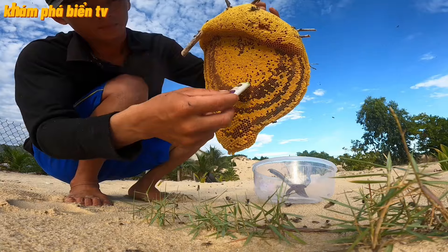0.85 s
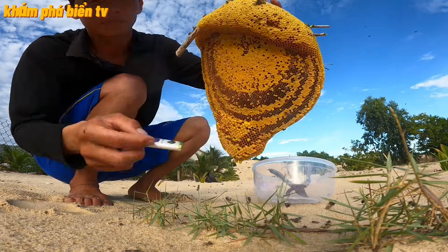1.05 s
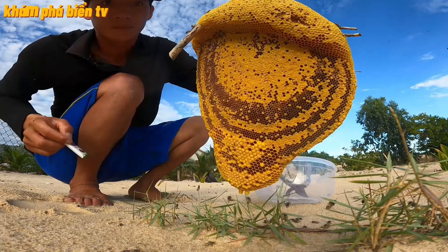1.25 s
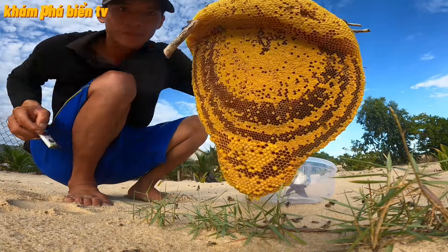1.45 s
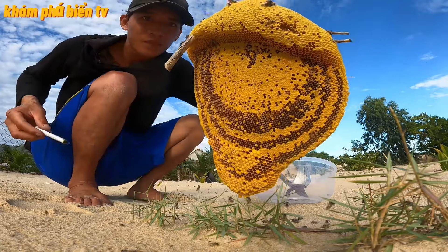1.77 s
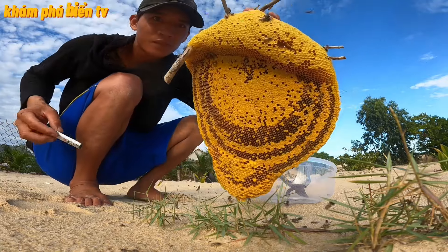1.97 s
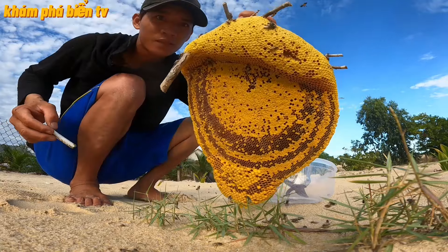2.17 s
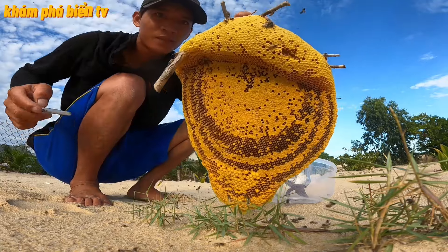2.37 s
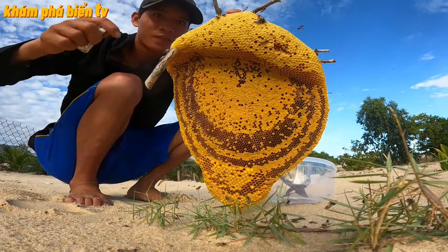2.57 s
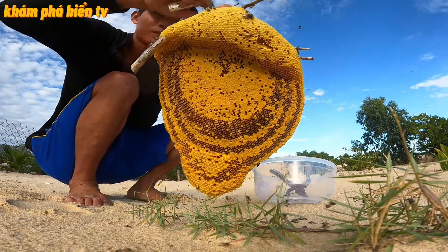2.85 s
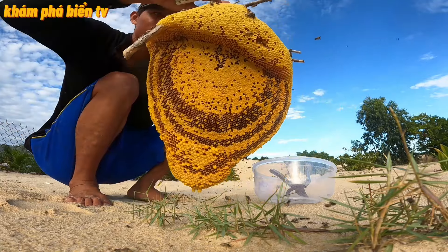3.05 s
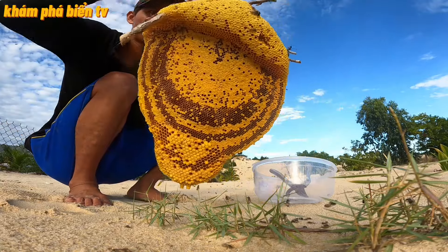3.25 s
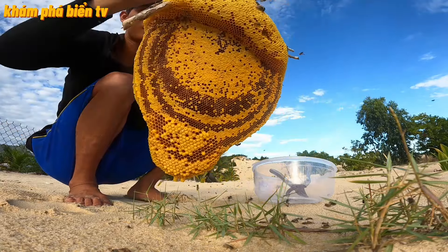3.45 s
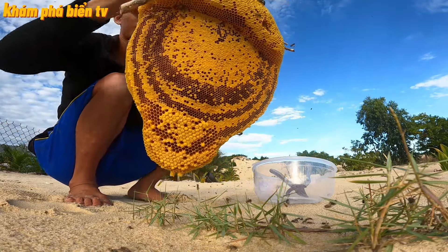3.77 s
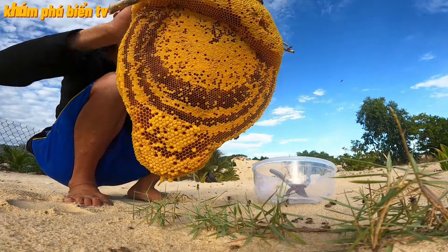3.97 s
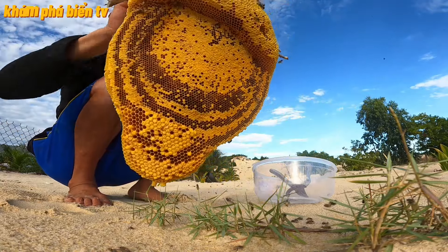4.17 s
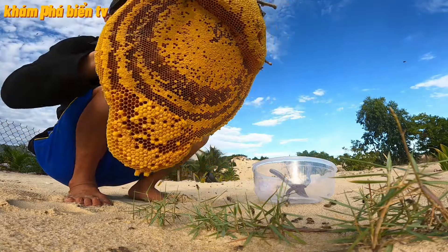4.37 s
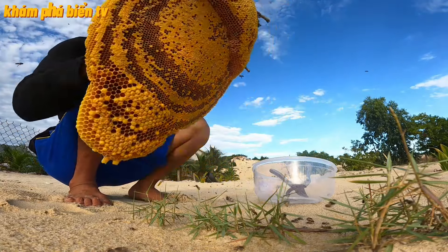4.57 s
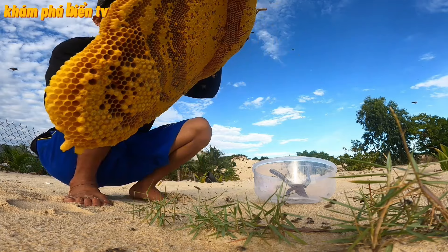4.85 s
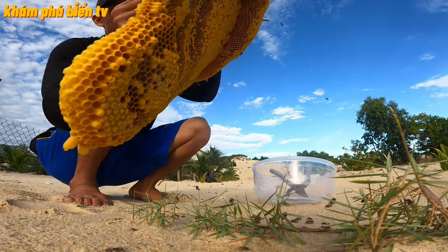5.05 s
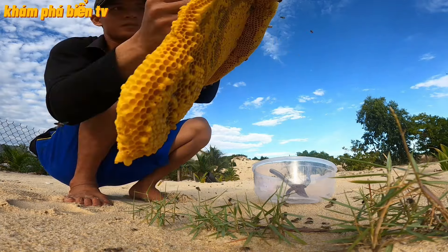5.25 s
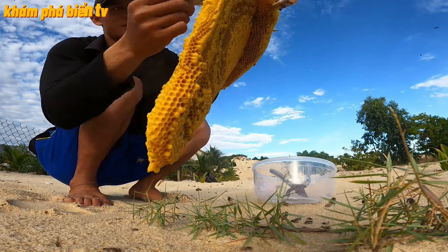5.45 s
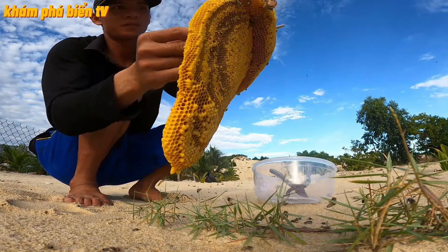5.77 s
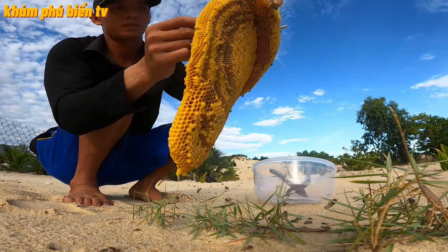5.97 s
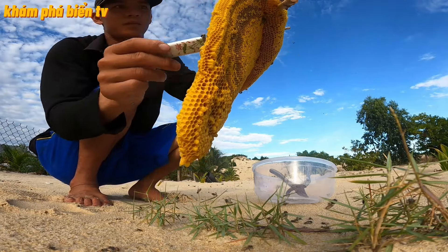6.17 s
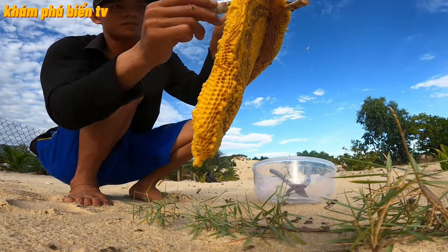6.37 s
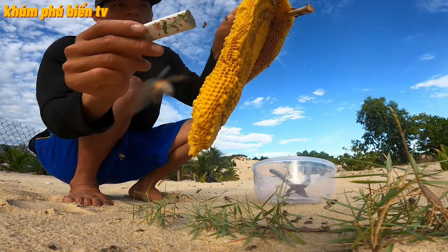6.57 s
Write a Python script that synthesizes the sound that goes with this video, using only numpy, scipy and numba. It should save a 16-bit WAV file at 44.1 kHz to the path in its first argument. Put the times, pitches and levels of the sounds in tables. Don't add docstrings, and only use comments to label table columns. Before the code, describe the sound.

Crisp scraping and cracking of comb wax, quieter ticking and faint bee hum, then sharp wrapper snaps, with gusty rumble and a low far-off motor.

```python
import sys
import numpy as np
from scipy import signal
from scipy.fft import rfft, irfft
from scipy.io import wavfile
from scipy.ndimage import uniform_filter1d
from numba import njit

SR = 44100
rng = np.random.default_rng(int(sys.argv[2]) if len(sys.argv) > 2 else 0)


def to_wav(sig):
    pcm = np.clip(np.atleast_2d(sig), -1, 1) * 32767
    pcm = np.round(pcm).astype(np.int16)
    wavfile.write(sys.argv[1], SR, pcm.T)


def ratio_of_db(decibels):
    return 10 ** (np.asarray(decibels, float) / 20)


N = 296352
T = np.arange(N) / SR
F = np.maximum(np.fft.rfftfreq(N, 1 / SR), 1)
TICK_T60_S = 0.015


def level(x, db=0):
    return x * ratio_of_db(db) / np.sqrt(np.mean(x ** 2))


def curves(table):
    s, *columns = np.transpose(table)
    return [np.interp(T, s, c) for c in columns]


def shape(points, hz):
    f, db = np.transpose(points)
    return np.interp(np.log(hz), np.log(f), db)


def walk(rate):
    k = int(SR / rate)
    held = np.repeat(rng.standard_normal(N // k + 1), k)
    return level(uniform_filter1d(uniform_filter1d(held, k), k)[:N])


def puffs(table):
    lift = 0
    for s, length, db in table:
        u = np.clip((T - s) / length, 0, 1)
        lift = lift + db * np.sqrt(np.sin(np.pi * u).clip(0))
    return lift


def swells(table, lull_db):
    size = ratio_of_db(lull_db)
    for s, length, db in table:
        u = np.clip((T - s) / length, -.5, .5)
        size = size + ratio_of_db(db) * np.cos(np.pi * u).clip(0) ** 1.33
    return size


def add(out, s, sound):
    i = int(s * SR)
    out[:, i:i + sound.shape[1]] += sound[:, :N - i]


@njit
def svf(x, hz, width):
    y, b, l = np.empty(len(x)), 0., 0.
    for i in range(len(x)):
        g, k = np.tan(np.pi * hz[i] / SR), width / hz[i]
        v = (b + g * (x[i] - l)) / (1 + g * (g + k))
        b, l, y[i] = 2 * v - b, l + 2 * g * v, k * v
    return y


def band(x, hz, width):
    y = svf(svf(x, hz + 0 * x, width), hz + 0 * x, width)
    return y / np.abs(y).max()


def grit(rate, scatter_db):
    size_db = np.minimum(scatter_db * rng.exponential(1, N), 5)
    return (rng.random(N) < rate / SR) * rng.standard_normal(N) * ratio_of_db(size_db)


def wax(shock, hz, width, body_db, dust_db, dust_hz):
    heard = []
    for c in shock:
        bright = band(svf(c, hz + 0 * c, 2 * width), hz, width)
        body = band(c, 915.0, 810.0) + 0.98 * band(c, 603.0, 570.0) + 0.42 * band(c, 455.0, 300.0)
        dust = band(c, dust_hz, 0.42 * dust_hz)
        heard.append(bright + ratio_of_db(body_db) * body + ratio_of_db(dust_db) * dust)
    return np.array(heard)


def strokes(table, width, dust_hz, rate, slip_db, pan_db):
    out, size = np.zeros((2, N)), 14000
    tear = level(grit(rate, 1.5)) + .8 * rng.standard_normal(N)
    tear = tear + .3 * rng.standard_normal((2, N))
    slip = ratio_of_db(slip_db * walk(170))
    pan = ratio_of_db(np.array([[pan_db], [-pan_db]]) / 2)
    for s, length, db, hz, body_db, dust_db in table:
        i = int(s * SR)
        u = np.clip(T[:min(size, N - i)] / length, 0, 1)
        swell = np.sin(np.pi * u).clip(0) ** .8 * (u < 1) * slip[i:i + size]
        sound = wax(tear[:, i:i + size], hz, width, body_db, dust_db, dust_hz)
        add(out, s, swell * level(sound, db + 3.5) * pan)
    return out


def ticks(table, dust_db, width_hz, t60_s, rise_s):
    lead_s = 176 / SR
    out, t = np.zeros((2, N)), T[:1400] - lead_s
    tail = np.exp(-np.log(1000) * t / t60_s)
    rise = np.exp(np.minimum(t, 0) / rise_s)
    envelope = np.where(t >= -.5 / SR, tail, rise)
    front = 11.0 * (np.abs(t) < .5 / SR)
    for s, db, hz, body_db in table:
        mid, left, right = rng.standard_normal((3, 1400))
        shock = (mid + .35 * np.array([left, right]) + front) * envelope
        add(out, s - lead_s, ratio_of_db(db) * wax(shock, hz, width_hz, body_db, dust_db, 7500.0))
    return out


def blade():
    # (time [s], length [s], grit level [dB], grit centre [Hz], comb body minus grit [dB])
    scrapes = [
        (0.055, 0.15, -58, 4830, -3.5),
        (0.386, 0.084, -56.5, 5230, -2),
        (0.604, 0.061, -64, 5200, -7),
        (0.74, 0.052, -51, 5140, -2),
        (0.779, 0.036, -44.5, 5960, -6),
        (1.082, 0.035, -45.5, 5330, -10),
        (2.563, 0.04, -65.5, 4870, -18),
        (3.548, 0.026, -59.5, 4570, -13),
        (3.936, 0.12, -61.5, 3020, 12),
        (4.338, 0.072, -63, 6290, -4),
    ]
    # (time [s], peak level [dB], centre [Hz])
    cuts = [(0.02, -38, 5330), (0.0901, -48, 4740), (0.078, -52, 5600), (0.1, -50, 4600),
            (0.113, -51, 3800), (0.147, -50, 5300), (0.171, -49, 4700), (0.18, -49, 5200),
            (0.189, -53, 4000), (0.1252, -54, 4550), (0.1353, -54, 5120), (0.158, -44, 4560),
            (0.3987, -47, 5060), (0.4018, -43, 4600), (0.4165, -47, 5640), (0.4225, -49, 5500),
            (0.4357, -40, 5380), (0.4562, -51, 5760), (0.4652, -40.5, 4400), (0.734, -45, 5700),
            (0.734, -52, 3000), (0.803, -44, 3200), (1.104, -38.5, 2880), (0.4, -52, 3000),
            (0.751, -51, 4790), (0.7544, -51, 4340), (0.7617, -44, 4440), (0.7683, -53, 5300),
            (0.7739, -44, 4720), (0.7773, -45, 6190), (0.784, -45, 5220), (0.7873, -42, 6240),
            (0.7937, -31, 5970), (0.7995, -44, 5970), (0.8027, -31, 6130), (0.8046, -38, 5600),
            (0.8107, -48, 5850), (1.0254, -47, 3500), (1.0256, -52, 6000), (1.0807, -47, 4490),
            (1.0871, -43, 5590), (1.09, -37, 5920), (1.096, -36, 5210), (1.0998, -31, 5200),
            (1.103, -32, 5470)]
    scraping = strokes([(*row, -12) for row in scrapes], 2750.0, 9300.0, 4000, 1.0, -2.2)
    cracking = ticks([(*row, -14.5) for row in cuts], -6.5, 1700.0, TICK_T60_S, 0.0008)
    return scraping + cracking


def thumps():
    # (time [s], peak level [dB], centre [Hz])
    comb_knocks = [(0.0201, -33.5, 1190), (0.022, -39, 600), (0.0923, -41, 710), (0.0979, -44, 895),
                   (0.1055, -42, 820), (0.082, -46, 1400), (0.125, -46, 950), (0.14, -43, 1050),
                   (0.165, -45, 1200), (0.183, -45, 700), (0.117, -45, 1040), (0.1498, -45, 1000),
                   (0.1574, -38.5, 970), (0.1741, -41, 820), (0.3977, -39, 980), (0.4007, -38, 910),
                   (0.419, -46, 1120), (0.423, -44, 950), (0.4336, -42, 840), (0.4368, -43, 900),
                   (0.464, -32, 1230), (0.7326, -38.5, 960), (0.755, -43, 1140), (0.7574, -37.5, 830),
                   (0.7653, -40, 1030), (0.7688, -49, 1110), (0.776, -48, 1300), (0.779, -43, 680),
                   (0.7865, -50, 950), (0.7886, -34.5, 700), (0.7895, -43, 1150), (0.762, -42, 616),
                   (0.7925, -37, 1320), (0.796, -42, 860), (0.8016, -40, 1100), (1.0675, -43, 900),
                   (1.0944, -48, 990), (1.1072, -35.5, 1320), (1.1122, -40, 1070)]
    # (time [s], peak level [dB], centre [Hz])
    twig_knocks = [
        (1.828, -45, 615),
        (3.559, -54, 1060),
        (3.992, -39.5, 501),
        (4.019, -46, 536),
        (4.069, -46, 1130),
        (4.108, -46, 703),
        (5.894, -46, 1267),
        (5.944, -44, 1180),
    ]
    out, t = np.zeros((2, N)), T[:2048]
    decay = np.exp(-np.log(1000) * t / 0.0095)
    for s, db, hz in [*comb_knocks, *twig_knocks]:
        mid, left, right = rng.standard_normal((3, 2048))
        shock = (mid + 0.49 * np.array([left, right]) + 6.1 * (t == 0)) * decay
        ring = [band(c, hz, 660) + 0.082 * band(c, 2.2 * hz, 1800.0) for c in shock]
        add(out, s, ratio_of_db(db) * np.array(ring))
    return out


def wrapper():
    # (time [s], length [s], level [dB], low part minus level [dB], fine dust minus level [dB])
    crinkles = [(4.835, 0.53, -71.5, -17, -25), (5.187, 0.33, -72, -23, -23), (5.447, 0.07, -65, -4, -11),
                (5.844, 0.18, -65, -5, -23), (5.889, 0.0091, -64, -10, -25), (5.94, 0.06, -63, 9, -23),
                (6, 0.074, -68.5, -11, -22), (6.232, 0.046, -55, -4, -13), (6.287, 0.0073, -52, -6, -8),
                (6.583, 0.005, -52, -28, -26), (6.592, 0.043, -54.5, -18, -27),
                (6.619, 0.025, -49, -18, -15), (6.638, 0.013, -45, -19, -8), (6.651, 0.016, -51, -14, -4),
                (6.662, 0.012, -45, -17, -2), (6.67, 0.012, -62, -11, -3)]
    # (time [s], peak level [dB], centre [Hz])
    snap_rows = [(5.8646, -43, 4040), (5.8897, -44, 3500), (5.8918, -49, 4300), (5.8962, -39, 4180),
                 (5.9239, -56, 4180), (5.9315, -53, 3510), (5.9439, -38, 4200), (5.951, -45, 3850),
                 (5.9538, -51, 3840), (5.9645, -56, 4430), (5.9678, -46, 3740), (5.9878, -55, 4320),
                 (6.0238, -54, 3970), (6.2065, -42.5, 4200), (6.2428, -60, 4220), (6.2465, -46, 4280),
                 (6.2492, -49, 4200), (6.2558, -47, 3460), (6.2588, -50, 4350), (6.2647, -48, 4110),
                 (6.2721, -51, 4160), (6.2862, -36.5, 4250), (6.288, -50, 4500), (6.2919, -53, 4490),
                 (6.5829, -40, 4870), (6.5833, -40, 3500), (6.5848, -42, 4600), (6.5866, -44, 4300),
                 (6.5972, -49, 3920), (6.6004, -55, 4520), (6.6045, -49, 4300), (6.6063, -40, 3910),
                 (6.6158, -43, 4270), (6.6101, -46, 3750), (6.618, -47, 4270), (6.6232, -30, 4370),
                 (6.6306, -41, 4270), (6.6357, -41, 4430), (6.6403, -36, 4460), (6.6425, -38, 4600),
                 (6.6432, -29, 4600), (6.645, -27, 4600), (6.6486, -32, 3850), (6.6495, -33, 4260),
                 (6.6539, -42, 4800), (6.641, -42, 7300), (6.644, -40, 7000), (6.651, -38, 7200),
                 (6.658, -43, 7600), (6.6655, -30, 7760), (6.6672, -37, 7350), (6.6695, -35, 7260),
                 (6.6665, -48, 10500), (6.6695, -31.5, 2900), (6.634, -46, 7200), (6.2895, -41, 4700),
                 (6.288, -48, 9300), (6.6569, -46, 4130), (6.6613, -30, 4570), (6.6645, -39, 4400),
                 (6.666, -25, 4900), (6.6676, -32, 4700), (6.668, -27.5, 4300)]
    thump_db, thump_follow, usual_snap_db = -56.5, 0.58, -38
    creases = [(s, length, db, 4180, low_db, dust_db) for s, length, db, low_db, dust_db in crinkles]
    snaps = []
    for s, db, hz in snap_rows:
        body_db = thump_db - db + thump_follow * (db - usual_snap_db)
        snaps.append((s, db, hz, body_db))
    creasing = strokes(creases, 1900.0, 6830.0, 3000, 1.2, .1)
    return creasing + ticks(snaps, -27, 1670.0, .007, .0003)


def strays():
    # (time [s], peak level [dB], centre [Hz], body minus peak [dB])
    stray_rows = [(1.8737, -44, 3590, -6), (2.1, -45.5, 5270, -2), (2.3, -51, 4060, -17),
                  (2.2221, -61, 4890, -10), (2.9981, -52, 5700, 1), (3.2344, -51, 3300, -9),
                  (3.9, -46, 4200, -2.5), (5.1, -55.5, 2900, -3), (4.0697, -50, 5546, 3),
                  (4.0996, -53, 7800, 2), (4.3172, -50, 6200, -16), (4.8548, -50, 4200, -5),
                  (5.1262, -56, 3340, 8), (5.3862, -49, 3700, -10), (5.4583, -45, 3866, -11),
                  (5.4707, -46, 4150, -8), (3.3, -51, 4500, -12), (3.5625, -47, 3300, -14),
                  (3, -46, 4200, -14), (3.565, -50, 4600, -14), (2.2, -50, 5000, -14),
                  (2.2, -54, 4100, -12), (2.075, -52, 3400, -12)]
    return ticks(stray_rows, -4, 2900.0, TICK_T60_S, 0.00037)


def motors():
    # (multiple of shaft rate [1], level [dB])
    faint_orders = [(.5, -65), (.75, -63), (1.499, -57)]
    # (time [s], second order level [dB], fourth order level [dB])
    clarity = [(0, -52.5, -54.5), (.3, -48.5, -56), (.6, -47.5, -63), (1.0, -46.5, -53.5), (1.3, -52, -65),
               (1.7, -47.5, -64.5), (2.2, -55, -62), (2.6, -78, -66), (2.9, -48, -72), (3.3, -52.5, -55),
               (3.7, -43, -68.5), (4.2, -51, -57.5), (4.6, -43, -52.5), (4.9, -44.5, -56.5),
               (5.2, -41.5, -53.5), (5.5, -45, -60), (5.95, -45, -50.5), (6.72, -46.5, -61)]
    # (middle time [s], length [s], level [dB])
    low_swells = [(.1, 0.61, -39.5), (.55, 0.59, -40), (1.5, 0.92, -38.5), (2.02, 0.092, -46),
                  (2.62, 0.68, -35.5), (3.1, 0.56, -30.5), (3.62, 0.74, -34.5), (4.4, 0.93, -37),
                  (4.8, 0.74, -49), (5.25, 0.68, -30.5), (5.55, 0.55, -35), (6.33, 0.7, -32)]
    # (middle time [s], length [s], level [dB])
    third_surges = [
        (2.1, .3, -65),
        (3.5, 0.25, -47),
        (5.62, 0.27, -50),
        (6.3, 0.34, -54.5),
    ]
    second_db, fourth_db = curves(clarity)
    low_hz = (61.26 - .5 * T) * (1 + 0.0025 * walk(9))
    low_size = swells(low_swells, -44) * ratio_of_db(.5 * walk(14))
    low = low_size * np.sin(2 * np.pi * np.cumsum(low_hz) / SR)
    shaft_hz = (59.4 - 0.04516 * T) * (1 + 0.00071 * walk(2.97))
    turn = 2 * np.pi * np.cumsum(shaft_hz) / SR
    second = ratio_of_db(second_db + 2.5 * walk(7))
    third = swells(third_surges, -63.5) * ratio_of_db(walk(3.9))
    fourth = ratio_of_db(fourth_db + .5 * walk(4.98))
    main = sum(size * np.sin(k * turn + k * k) for k, size in zip((2, 3, 4), (second, third, fourth)))
    minor = sum(ratio_of_db(db + 8.3 * walk(7.4)) * np.sin(k * turn + k * k) for k, db in faint_orders)
    fifth = fourth * ratio_of_db(-10) * np.sin(5 * turn)
    return np.sqrt(2) * (low + main + minor + fifth)


def wings(hz, db, pan_db):
    # (multiple of wing beat [1], level [dB])
    overtones = [(1, -3), (2, -8.5), (3, -13), (4, -17.5), (5, -26), (6, -14), (7, -28), (8, -34),
                 (10, -26.5)]
    beat = 2 * np.pi * np.cumsum(hz * (1 + .012 * walk(25))) / SR
    tone = sum(ratio_of_db(g + 2.65 * walk(15)) * np.sin(k * beat + k * k) for k, g in overtones)
    return np.sqrt(2) * tone * ratio_of_db(db + np.array([pan_db, -pan_db]) / 2)


def bees(count=10):
    # (time [s], wing beat [Hz], level [dB])
    near_bee = [
        (2.3, 220.2, -86),
        (2.9, 213, -63),
        (3.1, 220, -74),
        (3.5, 217, -61),
        (3.9, 212.6, -63.5),
        (4.55, 218.8, -55.5),
        (4.9, 213.2, -57.5),
        (5.1, 210.8, -61),
        (5.4, 203, -86),
    ]
    hz, db = curves(near_bee)
    away = (T < near_bee[0][0]) | (T > near_bee[-1][0])
    hum = wings(hz, db - 40 * away, 3.5 * walk(1.62))
    for f in 225 + 14 * np.linspace(-1.5, 1.5, count):
        pass_db = -69.5 + np.minimum(5.2 * walk(5), 5)
        hum = hum + wings(f * (1 + .025 * walk(4)), pass_db, 5.6 * walk(1.35))
    return hum


def callers():
    # (time [s], length [s], pitch [Hz], level [dB])
    peeps = [
        (3.175, 0.04, 3260, -77),
        (3.243, 0.022, 3250, -73),
        (3.275, .02, 3255, -76),
        (3.314, 0.13, 3255, -73),
        (3.795, 0.043, 3300, -80),
        (3.822, 0.096, 3270, -68),
    ]
    # (time [s], pitch [Hz], level [dB])
    whistle = [
        (2.39, 13500, -120),
        (2.43, 13900, -76),
        (2.47, 13900, -95),
        (2.52, 13900, -80),
        (2.58, 14070, -81),
        (2.66, 13500, -83),
        (2.69, 13500, -120),
    ]
    bird = 0
    for s, length, hz, db in peeps:
        u = np.clip((T - s) / length, 0, 1)
        swell = np.sin(np.pi * u).clip(0) ** 0.4 * (T < s + length)
        bird = bird + ratio_of_db(db) * swell * np.sin(2 * np.pi * hz * T)
    hz, db = curves(whistle)
    phase = 2 * np.pi * np.cumsum(hz + 150 * walk(120)) / SR
    insect = ratio_of_db(db + 3.0 * walk(30.7)) * np.sin(phase)
    return np.sqrt(2) * (bird * ratio_of_db(0.89 * walk(60)) + insect)


def spread(mid, side):
    # (frequency [Hz], side minus mid [dB])
    capsule_width = [(30, -38), (100, -47), (160, -28.5), (250, -17.5), (500, -10.5), (1200, -9),
                     (2600, -5), (5000, -9.5), (8000, -5.5), (10000, -11), (12500, -2)]
    side = irfft(rfft(side) * ratio_of_db(shape(capsule_width, F)), N)
    return np.array([mid + side, mid - side])


def airy(points, flicker_db, flicker_rate, grains=0.):
    low_hz, high_hz = points[0][0], points[-1][0]
    colour = ratio_of_db(shape(points, F)) * (F > low_hz) * (F < high_hz)
    pair = [rfft(rng.standard_normal(N) + grains * level(grit(900, 4.7))) * colour for _ in range(2)]
    mid, side = 0, 0
    for octave in np.arange(np.log2(low_hz), np.log2(high_hz) + .5, .5):
        window = np.maximum(1 - 2 * np.abs(np.log2(F) - octave), 0)
        gain = ratio_of_db(flicker_db * walk(flicker_rate))
        mid = mid + gain * irfft(pair[0] * window, N)
        side = side + gain * irfft(pair[1] * window, N)
    return level(spread(mid, side))


def air():
    # (frequency [Hz], density [dB per Hz])
    wind_colour = [(20, 7), (30, -3), (46, 1), (62, 1), (90, 0), (150, -3), (230, -12.5), (300, -18.5),
                   (450, -17), (700, -46.5)]
    wash_colour = [(350, -11.5), (550, 1), (780, -7), (1100, 1), (1500, -5.5), (2200, -16), (3000, -23.5),
                   (4500, -40)]
    rustle_colour = [(1500, 5.5), (2600, -4), (4500, -1), (6000, -4), (7600, -8), (8300, -10), (10000, -19)]
    fine_colour = [(6500, -3), (8300, -1), (10000, -5.5), (12300, -10), (13500, -17), (14900, -13)]
    # (time [s], level [dB])
    breeze = [
        (0.0, -62),
        (0.6, -64),
        (0.97, -59.5),
        (1.21, -63),
        (4.28, -62.5),
        (4.75, -59.5),
        (6.46, -56),
        (6.72, -59),
    ]
    # (time [s], rustle level [dB])
    handling = [(0, -67.5), (.6, -68), (.85, -67.5), (.97, -61), (1.28, -66), (1.36, -65), (1.75, -67.5),
                (1.87, -63), (2.02, -61), (2.3, -63), (2.75, -64.5), (3.03, -68), (3.4, -66.5),
                (3.7, -68.5), (5.4, -67.5), (5.9, -67.5), (6.3, -72), (6.72, -67)]
    # (time [s], length [s], lift of the rustle [dB])
    shifts = [(1.27, 0.042, 3.5), (1.32, 0.072, -4.5), (1.395, 0.046, -3), (1.46, .05, 3),
              (1.66, 0.15, -1.5), (1.86, 0.086, 2), (2.03, 0.051, 1.5), (2.11, 0.081, -0.5),
              (2.18, 0.039, -3.5), (2.215, 0.019, -1.5), (2.27, .025, -5), (3.1, 0.1, -3.5),
              (3.59, 0.12, -3.5), (.92, 0.15, 2.5), (3.35, .06, -1), (3.44, 0.072, 3.5), (3.89, .06, -3),
              (.93, .03, 2), (2.65, .12, -2), (5.98, .08, 0), (.2, .1, -1.5), (.66, .05, 0),
              (4.45, 0.14, 1)]
    # (time [s], length [s], lift of the fine rustle [dB])
    sifts = [
        (.05, 0.17, 3.5),
        (1.84, 0.092, 3),
        (2.21, 0.021, 7),
        (3.223, 0.077, 2),
        (4.304, 0.46, 4),
        (4.84, .03, 3),
        (5.444, 0.057, 7),
        (5.587, 0.013, 8),
        (6.622, 0.081, 10),
    ]
    (wash_db,), (rustle_db,) = curves(breeze), curves(handling)
    rustle_db = rustle_db + puffs(shifts)
    moves = rustle_db + 66
    shuffle = ratio_of_db(1.17 * walk(40))
    wind = ratio_of_db(-41 + walk(2.66)) * airy(wind_colour, 0.38, 6.5)
    wash = ratio_of_db(wash_db + 3.0 + 0.22 * moves) * airy(wash_colour, 1.7, 12.0, 0.27)
    rustle = ratio_of_db(rustle_db + 2.0) * airy(rustle_colour, 0.5, 14.0, 0.71)
    fine_db = puffs(sifts) - 71.5 + 0.4 * moves - 0.75 * T
    fine = ratio_of_db(fine_db) * airy(fine_colour, 0.56, 17.0, 0.98)
    return wind + wash + shuffle * (rustle + fine)


def scene():
    return blade() + thumps() + wrapper() + strays() + motors() + bees() + callers() + air()


def low_pass(x):
    return signal.sosfilt(signal.butter(12, 14930, fs=SR, output="sos"), x)


def record(dry):
    # (frequency [Hz], gain [dB])
    port_treble = [(7400, -0.5), (8200, -4.5), (12500, 2.5), (13300, 1), (14000, -8), (14900, -16)]
    hiss = ratio_of_db(-80.0) * irfft(rfft(rng.standard_normal(dry.shape)) * (F > 10800), N)
    lag_rad = np.array([[0.42], [0]]) * F / np.hypot(F, 1500.0) / (1 + (F / 8500) ** 6)
    ports = np.exp(-1j * lag_rad) * ratio_of_db(shape(port_treble, F))
    mix = irfft(rfft(dry + hiss) * ports, N)
    return low_pass(mix)


dry = scene()
out = record(dry)
to_wav(out)
```